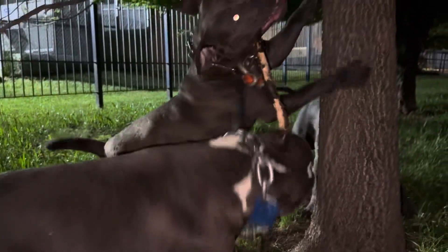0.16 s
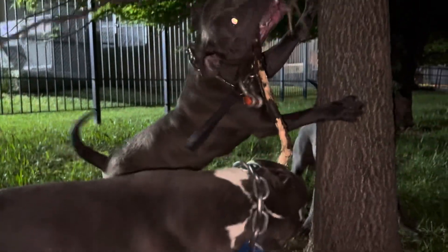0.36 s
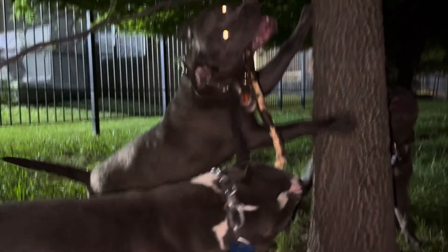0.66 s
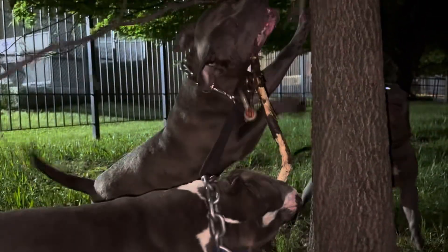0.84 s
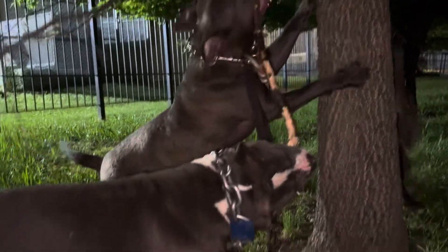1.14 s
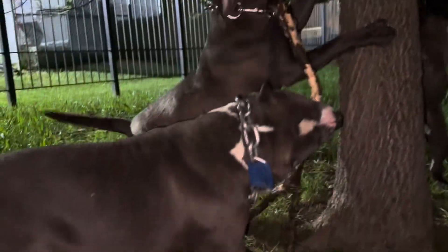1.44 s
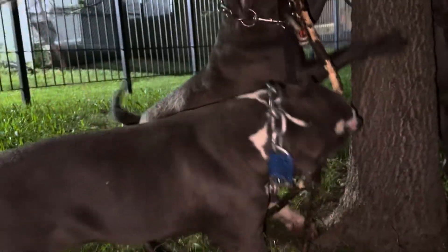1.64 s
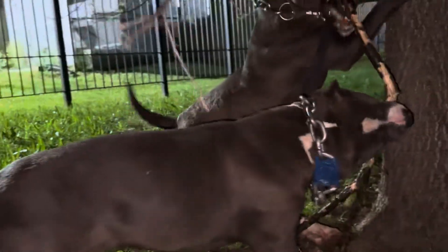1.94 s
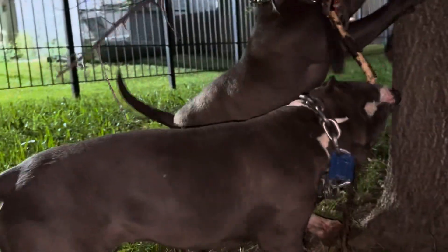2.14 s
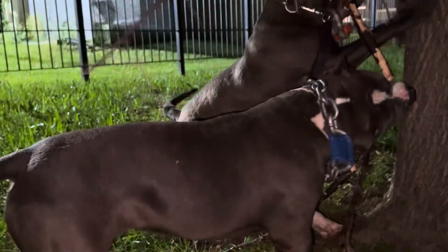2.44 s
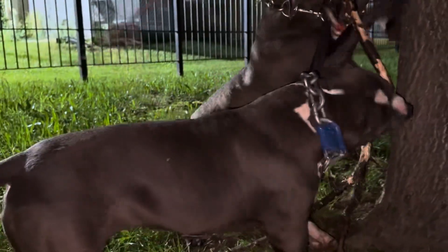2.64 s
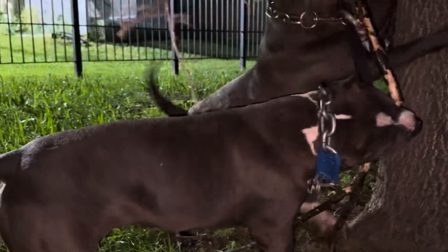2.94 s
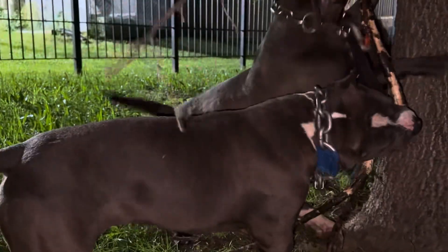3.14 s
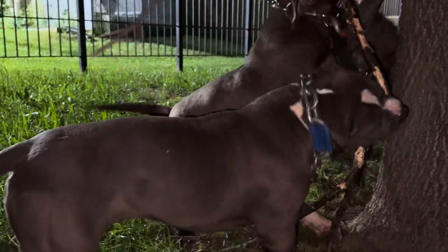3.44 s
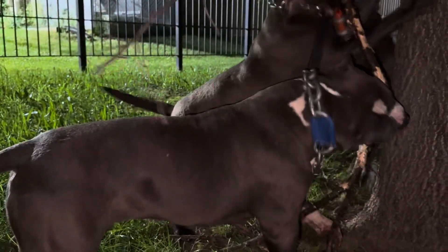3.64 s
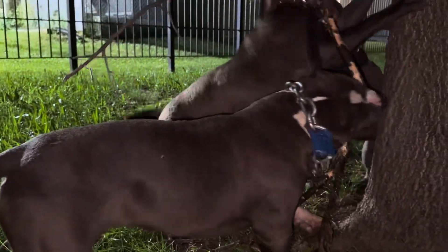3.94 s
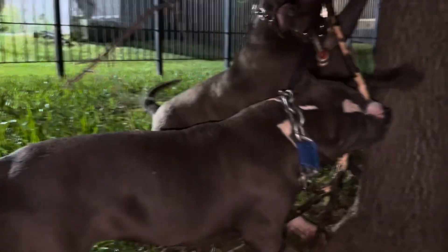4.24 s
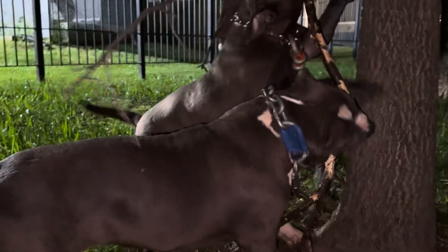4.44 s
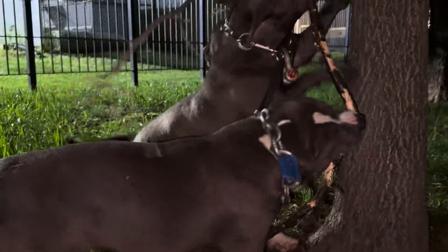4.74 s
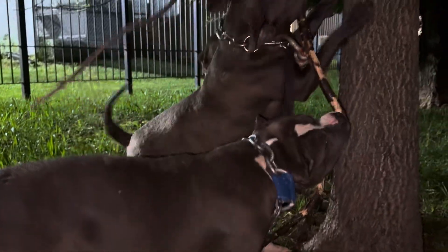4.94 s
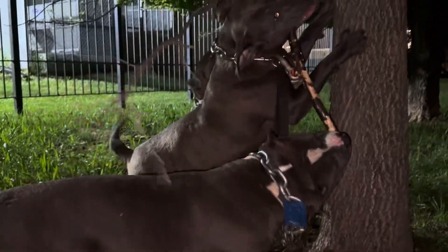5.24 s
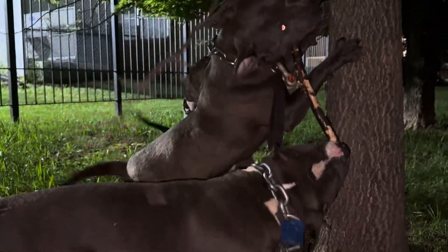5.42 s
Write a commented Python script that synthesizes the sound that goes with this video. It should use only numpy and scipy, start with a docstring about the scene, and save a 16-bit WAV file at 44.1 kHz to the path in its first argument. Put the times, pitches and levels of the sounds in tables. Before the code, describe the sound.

Dogs tug and gnaw a stick very close to a phone-like stereo microphone in a quiet yard at night. Uneven, throaty, fluttering breaths with a wet hiss run throughout, over lumpy low growls and single chest grunts, one strong at 0.3 s. Small bites and fibres tick constantly. A crack with a woody knock lands at 1.45 s. Around 1.8-2.1 s breathing gets harsher, a small metal tag clinks, a hoarse yelp lasts under a tenth of a second, and bright snaps follow. The loudest splintering comes at 2.7-2.95 s, then hard hollow knocks and a strong rasp near 3.07 s. Things ease around 3.2-4 s, with a slight clink at 3.44. A swelling rasp, sharp crack and knocks come at 4.2-4.4 s, then a knock at 4.76 and lighter cracking. Rasps continue until a low, rattling snarl starts at about 5.5 s. Reflections are short and dry; background air is faint.

```python
"""Dogs chewing a stick at night

Dogs tug and chew at a stick in a yard, heard close: rasping breaths of fluttering, resonant noise,
low growls of lumpy rumble and sine pulses, a harmonic yelp and a pulsed snarl.
Short damped rings make the knocks and the peaks of rasp and yelp, noise bursts split the stick, fibres
tick, and a collar tag clinks in high modes. A short scattered answer follows the hits, over faint night
air of shaped noise."""
import sys
import numpy as np
from scipy import signal
from scipy.fft import rfft, irfft, next_fast_len
from scipy.io import wavfile
from scipy.ndimage import uniform_filter1d, map_coordinates

SR = 44100
rng = np.random.default_rng(int(sys.argv[2]) if len(sys.argv) > 2 else 0)


def store_wav(level_fs):
    """Save 16-bit WAV to argv[1]."""
    pcm = np.round(np.clip(np.atleast_2d(level_fs), -1, 1) * 32767)
    wavfile.write(sys.argv[1], SR, pcm.T.astype(np.int16))


N = 246078


def breath():
    """Turbulent air, chopped by fluttering tissue, rings in throat, mouth and palate; the jaw moves the mouth."""
    # wet hiss colour: f/Hz, level/dB
    wet_colour = [(300, -51), (1500, 10.5), (2600, -2.5), (3200, 2.5), (3800, -2.5), (4500, -3.5),
                  (7000, -14.5), (15800, -40), (15950, -120)]
    # thin hiss colour: f/Hz, level/dB
    thin_colour = [(300, -26), (3000, -1), (6000, 1.5), (8000, 4.5), (11000, 2), (15800, -1), (15950, -120)]
    rasp_db, throat_db, palate_db, wet_db, thin_db, mouth_hz, palate_hz = breathing()

    flutter = amp(1.56 * wobble(110) + 0.11 * wobble(30))
    # wet tissue parting at uneven moments, 170 pops a second on average
    pops = (rng.random(N) < 170 / SR) * rng.standard_normal(N)
    turbulence = rng.standard_normal(N) + 0.52 * unit(pops)
    air = patchy(flutter * turbulence, depth_db=2.5)

    throat = unit(filtered(air, lambda hz: resonance(hz, 483, 385) ** 2 - 0.63 * resonance(hz, 849, 208) ** 2))
    mouth = moving(air, mouth_hz, width_hz=290)
    palate = moving(air, palate_hz + 110 * wobble(8.1), width_hz=570)  # the tongue shifts it about
    rasp = 0.42 * amp(rasp_db) * mouth + amp(throat_db) * throat + amp(palate_db) * palate

    wet = patchy(flutter * noise(wet_colour), depth_db=3.5)
    thin = patchy(amp(1.5 * wobble(70)) * noise(thin_colour), depth_db=2.5)
    return rasp + amp(wet_db + 3.5) * wet + amp(thin_db + 3.0) * thin


def breathing():
    """Each breath rises, holds and falls: five level curves in dB, then mouth and palate pitch in Hz."""
    # breaths past the wood; levels before the mix gains, throat and palate relative to the rasp column:
    # start/s, rise/s, hold/s, fall/s, rasp level/dB, mouth f/Hz, throat level/dB, palate level/dB,
    # palate f/Hz, wet hiss level/dB, thin hiss level/dB
    breaths = np.array([(0, 0.0018, 0.023, 0.45, -40, 1030, -10.5, -11.5, 2100, -56, -53),
                        (0.231, 0.048, 0.073, 0.073, -26.5, 945, -13, -19.5, 1930, -43.5, -54),
                        (0.396, 0.036, 0.054, .05, -44.5, 1010, -13, 1, 2060, -49.5, -73),
                        (0.451, 0.056, 0.092, 0.054, -31.5, 1030, -17, -12, 2010, -47.5, -51.5),
                        (0.569, 0.031, 0.083, 0.15, -35, 1100, -5, -7, 2310, -43.5, -51),
                        (0.833, 0.069, 0.056, 0.043, -43, 1480, 3, -23, 2040, -43, -63),
                        (0.966, 0.025, 0.048, 0.022, -40.5, 1580, -6, -2.5, 1980, -49, -66),
                        (1.062, 0.074, 0.11, 0.14, -30, 1200, -7.5, -11, 2290, -44, -47),
                        (1.342, 0.1, 0.045, 0.031, -33.5, 1070, -15.5, -20, 1960, -52.5, -57),
                        (1.494, 0.022, .12, 0.23, -42, 1150, -4.5, -20, 2100, -50.5, -55.5),
                        (1.774, 0.068, 0.03, 0.086, -26, 1470, -10.5, -16, 2200, -49, -46.5),
                        (1.88, 0.042, 0.052, 0.21, -23, 1016, -11, -11.5, 1950, -43.5, -41),
                        (2.085, 0.074, 0.1, 0.043, -51, 1190, 7.5, 7.5, 2240, -52, -50),
                        (2.288, 0.039, 0.12, 0.065, -49.5, 1950, -6, 2, 2870, -51.5, -62),
                        (2.372, .12, 0.077, 0.093, -39.5, 1340, 0.5, 0, 1890, -44, -55.5),
                        (2.647, 0.0092, 0.017, 0.06, -31, 753, -7, -19, 2000, -54, -50),
                        (2.71, 0.0087, 0.013, 0.11, -30, 1340, -7, -23, 2000, -42.5, -46),
                        (2.827, .04, 0.1, 0.16, -32, 1160, -8, -10.5, 2100, -46, -41.5),
                        (3.056, 0.012, .03, 0.068, -22, 1360, -5, -7.5, 1870, -36, -41),
                        (3.089, 0.018, .055, 0.1, -28, 860, -0.5, -9, 1950, -36.5, -42.5),
                        (3.192, .02, 0.15, .06, -45.5, 1250, -4, -9, 1830, -56.5, -60),
                        (3.372, 0.041, 0.072, 0.028, -35, 1430, -5.5, -17, 1960, -57, -64),
                        (3.58, 0.059, 0.024, 0.02, -43, 1110, -5.5, -26, 2020, -57, -54.5),
                        (3.733, 0.06, 0.052, 0.15, -33, 1240, -2.5, -3.5, 1950, -45, -46),
                        (3.956, 0.088, 0.14, 0.11, -36, 1095, -5.5, -8.5, 2030, -54, -57.5),
                        (4.173, 0.14, 0.11, .14, -23, 1170, -9.5, -16.5, 2030, -42, -44),
                        (4.436, 0.047, 0.072, .035, -28, 1110, -8.5, -10.5, 1920, -45.5, -50),
                        (4.631, 0.021, 0.085, 0.15, -42.5, 1330, -3.5, -7, 1880, -50, -55.5),
                        (4.738, 0.039, 0.063, 0.11, -27.5, 842, -8, -9.5, 2000, -49.5, -57),
                        (4.97, 0.023, 0.048, 0.024, -47, 1230, -11, -14, 2130, -57.5, -68),
                        (5.064, 0.029, 0.087, 0.08, -25, 1516, -13, -6.5, 1890, -41, -53),
                        (5.22, 0.037, 0.15, 0.15, -48.5, 1140, -2.5, -6.5, 2190, -59, -66),
                        (5.32, 0.13, 0.024, 0.036, -34, 900, 0.5, -7, 2250, -47.5, -76),
                        (5.475, 0.032, .1, .05, -23.5, 933, -3.5, -27, 2100, -41.5, -46.5)])
    edge_db = 20  # a breath starts and ends this far under its hold
    still_rasp_db, still_hiss_db = -58, -65.5  # floors between breaths

    t = np.arange(0, N, 32) / SR
    columns = breaths.T[..., None]
    start, rise, hold, fall, rasp_db, mouth_hz, throat_db, palate_db, palate_hz, wet_db, thin_db = columns
    before = np.minimum((t - start - rise) / rise, 0)
    after = np.maximum((t - start - rise - hold) / fall, 0)
    shape_db = edge_db * (before - after)

    def power(db):
        return amp(2 * (db + shape_db)) + 1e-30

    def level(db, still_db=still_rasp_db):
        return 10 * np.log10(power(db).sum(0) + amp(2 * still_db))

    def blend(hz, db):
        """Pitch of overlapping breaths, weighted by their power."""
        return (power(db) * hz).sum(0) / power(db).sum(0)

    coarse = [level(rasp_db), level(rasp_db + throat_db), level(rasp_db + palate_db),
              level(wet_db, still_hiss_db), level(thin_db, still_hiss_db),
              blend(mouth_hz, rasp_db), blend(palate_hz, rasp_db + palate_db)]
    return [np.interp(np.arange(N) / SR, t, curve) for curve in coarse]


def growl():
    """A chest rumble that comes in uneven lumps, with single strong pulses that die in a few cycles."""
    # rumble that swells and sinks: t/s, level/dB
    rumble_curve = [(0.0, -49), (0.29, -38.5), (0.81, -46), (0.95, -30.5), (0.99, -44), (1.49, -43),
                    (1.6, -31.5), (1.63, -46), (3.01, -39), (3.11, -35), (3.19, -48), (3.84, -38),
                    (3.96, -53), (4.43, -35), (4.62, -48), (4.88, -41), (4.96, -53), (5.58, -34.5)]
    # single chest pulses: t/s, level/dB (before the pulse and swell gains), f/Hz
    grunts = [(0.071, -33, 95.5), (0.113, -28.5, 120), (0.275, -49, 182), (0.305, -20.5, 99),
              (0.35, -29, 130), (0.926, -24, 105), (1.458, -34, 136), (1.578, -32.5, 240),
              (1.583, -21.5, 120.7), (1.768, -33, 180), (1.948, -24, 98), (2.128, -24, 88),
              (2.434, -25, 94), (2.558, -23, 101), (2.663, -22.5, 163), (2.801, -39, 85.06),
              (3.093, -21.5, 102), (3.251, -28.5, 216), (3.424, -32, 112), (3.643, -26, 111),
              (3.8, -22, 80), (4.129, -34, 86.1), (4.411, -30, 95), (4.69, -32, 101), (4.85, -29.5, 109),
              (5.424, -21, 118)]
    # chest colour: f/Hz, level/dB per Hz
    chest_colour = [(20, -44), (35, -4.5), (55, -2), (85, 2.5), (115, -2), (160, -4.5), (250, -7.5),
                    (320, -18), (450, -36), (700, -120)]
    # rumble gathers round each pulse: level re pulse column, half width, delay
    swell_db, swell_s, swell_lag_s = -15.5, 0.025, 0.015

    t, pulses = np.arange(N) / SR, np.zeros(N)
    times, levels_db = np.transpose(rumble_curve)
    power = amp(2 * np.interp(t, times, levels_db))
    for s, db, hz in grunts:
        cycles = np.arange(SR // 12) / SR * hz
        add(pulses, s, amp(db + 5.5) * np.sin(2 * np.pi * cycles) * cycles * np.exp(-1.3 * cycles))
        swell = np.exp(-((t - s - swell_lag_s) / swell_s) ** 2)
        power = power + amp(2 * (db + swell_db)) * swell
    lumps = amp(4.5 * wobble(28))
    return pulses + np.sqrt(power) * unit(lumps * noise(chest_colour))


def snarl():
    """Vocal folds slap shut once a cycle and ring the mouth; the chest hums at the pitch, sagging as it fades."""
    start_s, level_db, fade_db_per_s = 5.488, -25, 27
    pitch_hz, sag_hz_per_s = 98, 150

    t = np.arange(N) / SR - start_s
    sagging_hz = pitch_hz - sag_hz_per_s * np.clip(t - .03, 0, None)
    cycles = np.cumsum(sagging_hz * (1 + 0.0518 * wobble(60))) / SR
    slaps = np.diff(np.floor(cycles), prepend=0) * amp(1.6 * wobble(110))
    mouth = filtered(slaps, lambda hz: resonance(hz, 893, 180) ** 2 - 0.23 * resonance(hz, 620, 380) ** 2)
    hum = 0.62 * np.sin(2 * np.pi * cycles)
    onset = np.clip(t / 0.0066, 0, 1)
    return onset * amp(level_db - fade_db_per_s * np.abs(t)) * (unit(mouth) + hum)


def yelp():
    """A short hoarse yelp: a few harmonics, each of unsteady level, on an unsteady pitch."""
    start_s, length_s, pitch_hz = 1.922, 0.085, 513
    harmonics_db = [-31, -26.5, -31.5, -39]  # centre level of each, from the fundamental up

    u = np.clip((np.arange(N) / SR - start_s) / length_s, 0, 1)
    phase = 2 * np.pi * np.cumsum(pitch_hz * (1 + .05 * wobble(160))) / SR
    voice = np.zeros(N)
    for k, db in enumerate(harmonics_db, start=1):
        voice += amp(db + 4.7 * wobble(90)) * np.sin(k * phase)
    return np.sin(np.pi * u) ** 0.47 * (u < 1) * voice


def splinters():
    """Splinters snap as short noise bursts, each a sharp and a dull resonance of the wood."""
    # splinters snapping: t/s, level/dB (before burst gains), dull part level/dB re the snap, t60/s
    cracks = [(0.0722, -25, -9.5, 0.035), (0.1516, -38, -2, 0.035), (0.1764, -33, -8, 0.065),
              (0.7916, -31, 8, 0.02), (0.8405, -31.5, -12.5, 0.068), (1.071, -27.5, -10, 0.094),
              (1.3753, -35, -3, 0.046), (1.4556, -15.5, -4.5, 0.022), (1.7449, -31, -8, 0.055),
              (1.8347, -34, -4, 0.03), (1.8592, -25, -4, 0.041), (1.8831, -22.5, -16, 0.03),
              (2.0103, -14, -32, 0.029), (2.0577, -14, -13.5, 0.013), (2.2114, -37.5, 8.5, 0.05),
              (2.3695, -29, -29, 0.044), (2.5356, -30.5, 0.5, 0.067), (2.5925, -31, -1, 0.042),
              (2.7277, -22.5, -5, 0.021), (2.7372, -11.5, -24, 0.018), (2.8399, -8.5, -16.5, 0.051),
              (2.8729, -14, -18, 0.055), (2.9287, -19.5, -15, 0.025), (3.0126, -22.5, -8.5, 0.098),
              (3.0674, -24.5, 0.5, 0.053), (3.0789, -20, 1, 0.052), (3.1981, -30.5, 6, 0.03),
              (3.2324, -39, 4.5, 0.11), (3.3702, -46, -1, 0.031), (3.4271, -30, -6.5, 0.05),
              (3.4401, -24.5, 3, 0.026), (3.479, -21.5, -6, 0.021), (3.5783, -46, -2, 0.038),
              (3.6282, -26.5, -13.5, 0.051), (3.704, -37, -17, 0.065), (3.8257, -23, -5, 0.021),
              (4.0412, -28, -21, 0.035), (4.1126, -22.5, -11, 0.024), (4.2462, -9.5, -18.5, 0.029),
              (4.6129, -32.5, -21, 0.09), (4.7631, -28, -10.5, 0.04), (4.8678, -28, -22, 0.035),
              (4.9117, -22, -13.5, 0.033), (4.9224, -27, -29, 0.032), (5.0063, -36, -10, 0.02),
              (5.0853, -25.5, -10, 0.1), (5.3318, -32, -26, 0.035), (5.4046, -47, -1, 0.03)]

    sharp, dull = np.zeros(N), np.zeros(N)
    t = np.arange(SR // 8) / SR
    for s, db, dull_db, t60 in cracks:
        tear = amp(-60 * t / t60) + 0.9 * amp(-60 * t / 0.006)  # a slower tearing and a sharp snap
        burst = amp(db - 6) * tear * (1 - np.exp(-t / 0.0003))
        add(sharp, s, 0.96 * burst * rng.standard_normal(len(t)))
        add(dull, s, 4.6 * amp(dull_db) * burst * rng.standard_normal(len(t)))
    sharp_ring = filtered(sharp, lambda hz: resonance(hz, 11400, 7900))
    dull_ring = filtered(dull, lambda hz: resonance(hz, 2550, 1950))
    return sharp_ring + dull_ring


def short_rings():
    """Knocks, short peaks of rasp and yelp, and small bites: each a damped pair of sines, high ones dying sooner."""
    t60_s = 0.022  # at 1 kHz

    out, t = np.zeros(N), np.arange(SR // 8) / SR
    for s, db, hz in ring_events():
        upper_hz = hz * rng.uniform(1.47, 1.9)
        ring = np.sin(2 * np.pi * hz * t) + 0.26 * np.sin(2 * np.pi * upper_hz * t)
        decay_db = 60 * t / t60_s * (hz / 1000) ** 0.32
        add(out, s, amp(db + 1.5 - decay_db) * (1 - np.exp(-t / 0.0011)) * ring)
    return out


def ring_events():
    """The listed rings, and small random bites that follow the rasp in strength and the mouth in pitch."""
    # knocks, and short ringing peaks of the rasp and the yelp: t/s, level/dB (before the ring gain), f/Hz
    listed = [(0.276, -41, 935), (0.297, -17.5, 714), (0.34, -27, 900), (0.792, -17, 1010),
              (0.916, -25.5, 484), (0.987, -27.5, 493), (1.087, -25, 456), (1.141, -25, 1120),
              (1.191, -22, 560), (1.455, -17.5, 1140), (1.523, -25.5, 368), (1.568, -24, 965),
              (1.814, -21, 456), (1.925, -14, 969), (1.966, -11, 1064), (2.47, -27, 580), (2.667, -19, 810),
              (2.679, -19, 700), (2.718, -20.5, 493), (2.839, -27, 2500), (2.873, -10, 1152),
              (2.916, -19.5, 1126), (2.99, -18.5, 2150), (3.067, -9.5, 1330), (3.08, -10.5, 1336),
              (3.439, -23, 2400), (3.578, -36.5, 1050), (3.828, -18, 480), (4.347, -11, 1140),
              (4.359, -12, 1400), (4.396, -13, 1110), (4.662, -28, 444), (4.761, -14, 788),
              (5.087, -21.5, 430), (5.415, -18, 500), (5.448, -25, 590)]
    gnaws_per_s, gnaw_db = 25, 0.25  # small bites; least level over the rasp curve

    rasp_db, *_, mouth_hz, _ = breathing()
    draw = rng.random((round(gnaws_per_s * N / SR), 3))
    at = (draw[:, 0] * N).astype(int)
    small_db = rasp_db[at] + gnaw_db - 2.15 * np.log(draw[:, 1])  # a few come out much louder
    small_hz = mouth_hz[at] * 1.5 ** (draw[:, 2] - .55)
    return [*listed, *zip(at / SR, small_db, small_hz)]


def fibres(count):
    """Tiny fibres and spit tick at random, following the wet hiss; each rings a few cycles at its own pitch."""
    draw, t = rng.random((count, 3)), np.arange(200) / SR
    at = (draw[:, 0] * (N - 200)).astype(int)
    hz = 1200 * 9 ** draw[:, 1:2]
    wet_db = breathing()[3][at, None]
    size = amp(wet_db + 5.5 - 3.35 * np.log(draw[:, 2:]))
    ticks = size * np.sin(2 * np.pi * hz * t) * np.exp(-hz * t / 1.6)
    places = at[:, None] + np.arange(200)
    return np.bincount(places.ravel(), ticks.ravel(), N)


def tags():
    """A metal tag on the chain collar rings in a few high modes, roughened as it chatters against the links."""
    # clinks: t/s, level/dB, extra level/dB of the modes above 6 kHz
    clinks = [(1.855, -32, -5), (2.63, -46, -10), (3.441, -48, 20), (4.912, -42, 5)]
    # modes of the tag: f/Hz, level/dB, t60/s
    modes = [(5330, 0, .12), (5450, -9, .05), (7960, 0, .09), (8610, -6, .04), (11300, -14, .04)]

    out, t = np.zeros(N), np.arange(SR // 4) / SR
    for s, db, upper_db in clinks:
        chatter = amp(4 * wobble(160)[:len(t)])
        for hz, mode_db, t60 in modes:
            level_db = db + mode_db + upper_db * (hz > 6000)
            add(out, s, amp(level_db - 60 * t / t60) * chatter * np.sin(2 * np.pi * hz * t))
    return out


def yard(x):
    """The ground, trunk and fence send back a short scattered answer: a decaying noise tail, 3 ms late."""
    t = np.arange(SR // 8) / SR
    tail = rng.standard_normal(len(t)) * amp(-60 * t / 0.065)
    return signal.fftconvolve(np.pad(x, (130, 0)), tail / np.linalg.norm(tail))[:N]


def night_air():
    """Faint night air: noise weighted to the lows."""
    # night air colour: f/Hz, level/dB per Hz
    air_colour = [(18, -38), (30, 25), (95, 22), (311, -7), (575, 4.5), (1010, 4), (1220, -15.5),
                  (6250, -73), (8500, -63), (11000, -58), (18700, -120)]
    return amp(-50.5) * noise(air_colour)


def amp(db):
    """Decibels to a linear factor."""
    return 10 ** (np.asarray(db) / 20)


def unit(x):
    """x scaled to an RMS of 1."""
    return x / np.sqrt(np.mean(np.abs(x) ** 2) + 1e-20)


def along(points, hz):
    """Interpolate (Hz, value) points on a log frequency axis."""
    f, v = np.transpose(points)
    return np.interp(np.log(hz + 1), np.log(f + 1), v)


def wobble(rate):
    """A smooth random curve, rate knots a second."""
    knots = rng.standard_normal(int(N * rate / SR) + 4)
    return map_coordinates(knots, [np.arange(N) * rate / SR])


def filtered(x, response):
    """x times a complex response of frequency."""
    m = next_fast_len(N + SR // 2)
    return irfft(rfft(x, m) * response(np.fft.rfftfreq(m, 1 / SR)), m)[..., :N]


def resonance(f, hz, width_hz):
    """A causal resonance of peak gain 1."""
    return 1j * f * width_hz / (hz * hz - f * f + 1j * f * width_hz)


def noise(spectrum):
    """Noise of RMS 1 coloured by (Hz, dB) points."""
    return unit(filtered(rng.standard_normal(N), lambda hz: amp(along(spectrum, hz))))


def add(track, s, sound):
    """Mix sound into track at s seconds."""
    at = round(s * SR)
    track[at:at + len(sound)] += sound[:len(track) - at]


def moving(x, centre_hz, width_hz):
    """x through a doubled resonance whose centre follows a curve, at RMS 1."""
    f, t, z = signal.stft(x, SR, nperseg=1024, noverlap=896)
    frame_hz = centre_hz[np.clip((t * SR).astype(int), 0, N - 1)]
    shape = resonance(f[:, None], frame_hz, width_hz) ** 2
    return unit(signal.istft(z * shape, SR, nperseg=1024, noverlap=896)[1][:N])


def patchy(x, depth_db):
    """Random patches of gain over time and frequency, at RMS 1."""
    z = signal.stft(x, nperseg=256)[2]
    across_bands = uniform_filter1d(rng.standard_normal(z.shape), 4, 0)
    field = uniform_filter1d(across_bands, 8, 1)
    return unit(signal.istft(z * amp(depth_db * unit(field)), nperseg=256)[1][:N])


def scene():
    """Mix the layers, then widen: left and right differ by scattered sound of equal overall level."""
    # left-right likeness: f/Hz, likeness (1 = identical)
    likeness = [(40, .99), (150, .985), (600, .95), (1500, .88), (2300, .97), (4000, .95), (16000, .99)]
    hits = splinters() + short_rings() + tags() + fibres(count=400)
    near = breath() + growl() + snarl() + yelp() + hits + amp(-9.0) * yard(hits) + night_air()
    scattered = unit(yard(near)) * np.std(near)

    def turn(hz):
        return np.arccos(np.clip(along(likeness, hz), 0, 1)) / 2

    mid = filtered(near, lambda hz: np.cos(turn(hz)))
    side = filtered(scattered, lambda hz: np.sin(turn(hz)))
    return np.array([mid + side, mid - side])


def record(dry):
    """Two phone ports differ in phase and level; the deepest bass and all above the band limit are cut."""
    # left minus right: f/Hz, level/dB
    tilt = [(60, -.4), (180, -.6), (550, -1.2), (1650, -1.8), (4970, 1.3), (8000, 0)]
    # lag of the left port, before the treble slip: f/Hz, phase/rad
    lag = [(100, 0), (700, .3), (1200, .3), (1700, .45), (2300, 0), (3300, -.25), (4500, 0)]
    top_hz, bass_cut_hz = 16500, 43.5

    def ports(hz):
        # above about 8 kHz the ports slip half a turn every 1555 Hz, in five soft steps
        steps = np.clip((hz - 7940) / 1555, 0, 5)
        stairs = steps - .75 * np.sin(2 * np.pi * steps) / (2 * np.pi)
        slip = np.pi * stairs * np.clip((hz - 8100) / 1250, 0, 1)
        side = np.array([[-.5], [.5]])  # left, right
        phase = np.exp(1j * (slip + along(lag, hz)) * side)
        band = (hz < top_hz) * hz ** 4 / (hz ** 4 + bass_cut_hz ** 4)
        return phase * amp(-side * along(tilt, hz)) * band

    return filtered(dry, ports)


dry = scene()
out = record(dry)
store_wav(out)
```